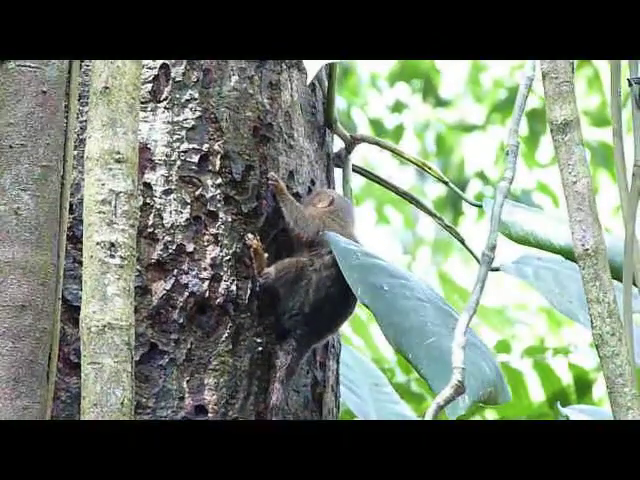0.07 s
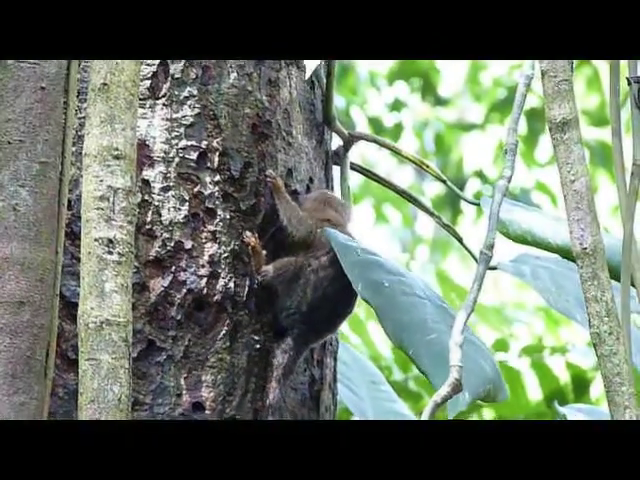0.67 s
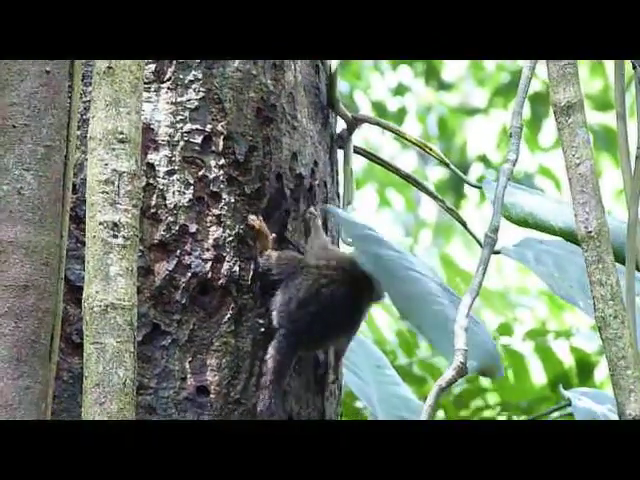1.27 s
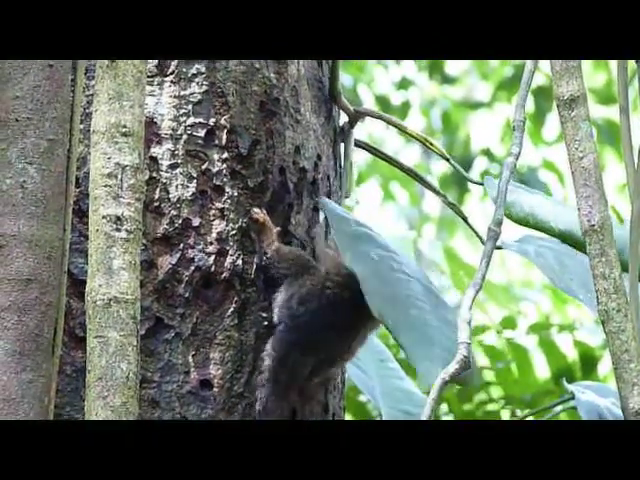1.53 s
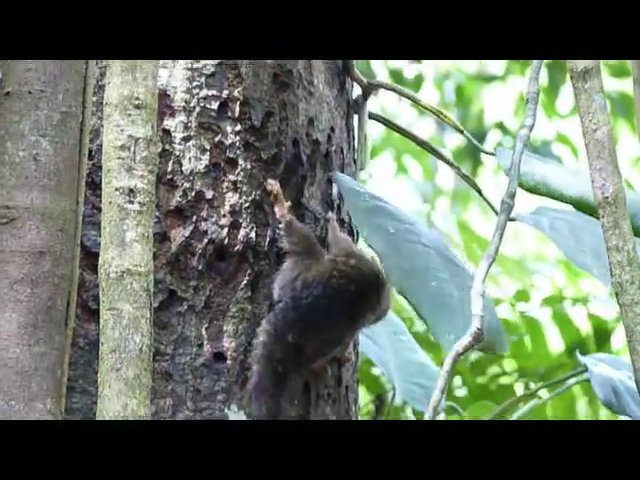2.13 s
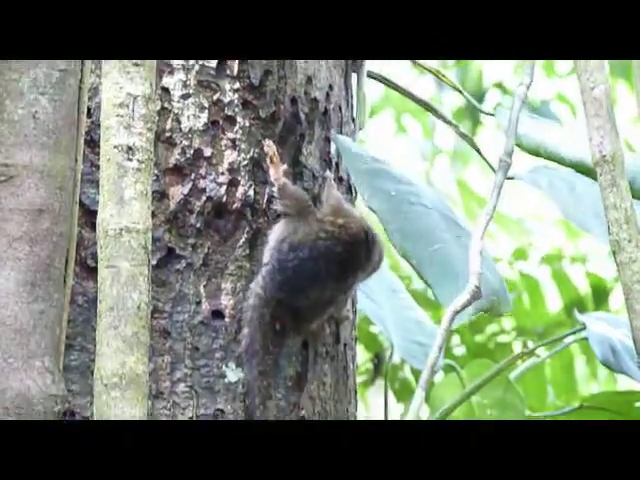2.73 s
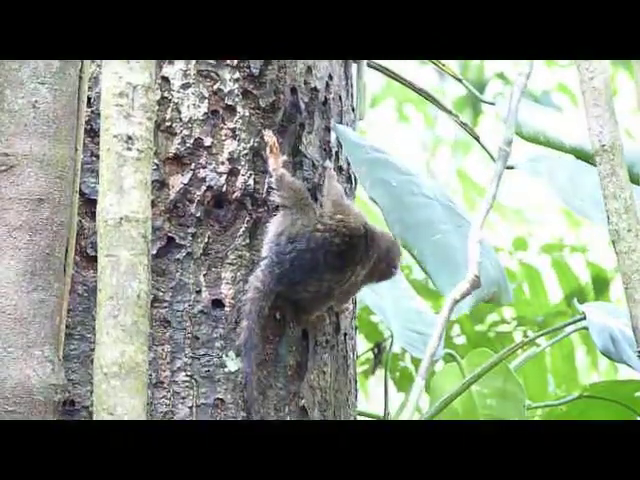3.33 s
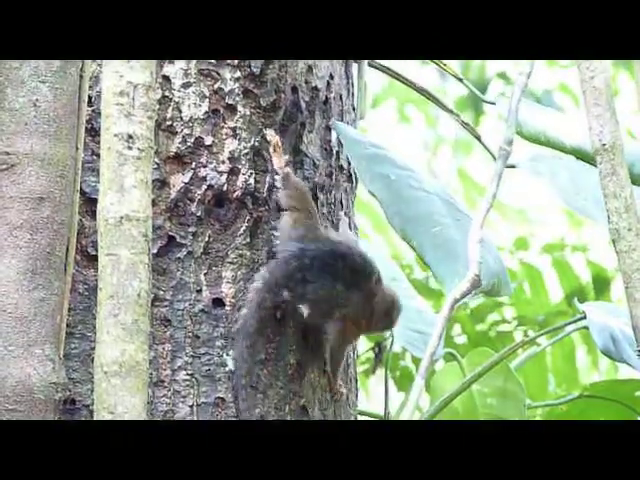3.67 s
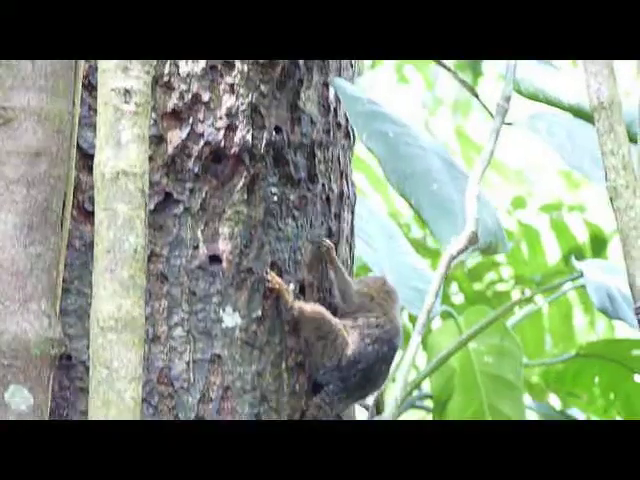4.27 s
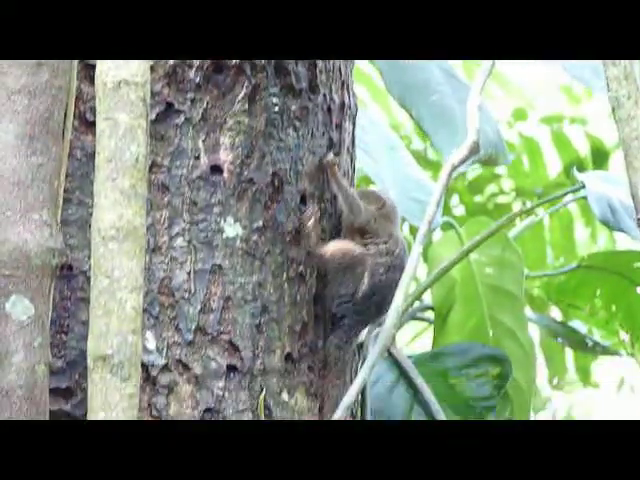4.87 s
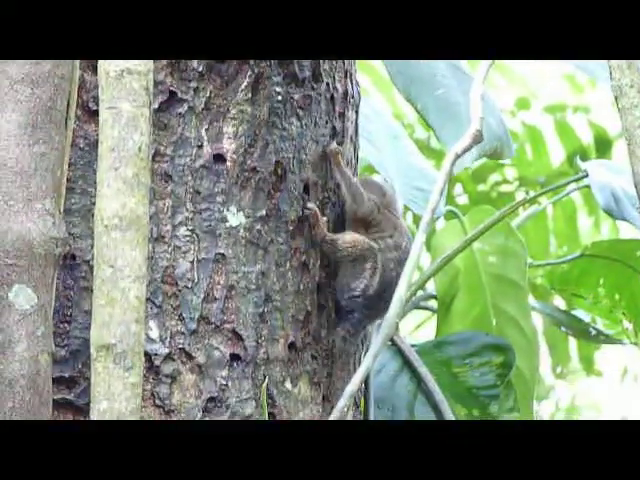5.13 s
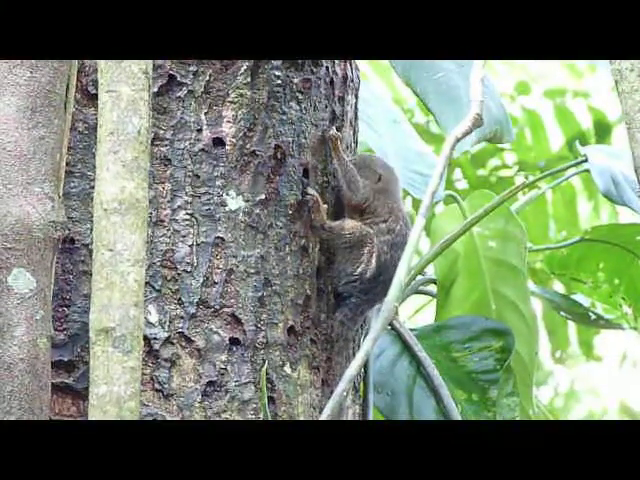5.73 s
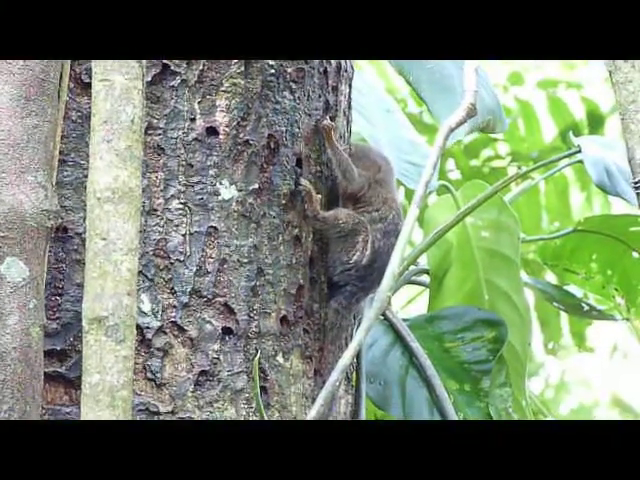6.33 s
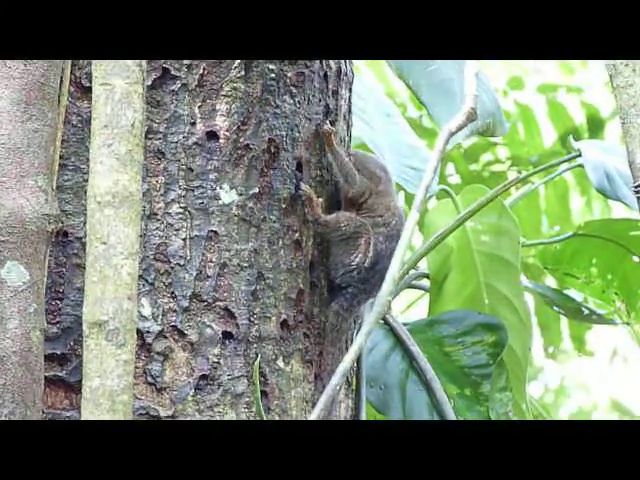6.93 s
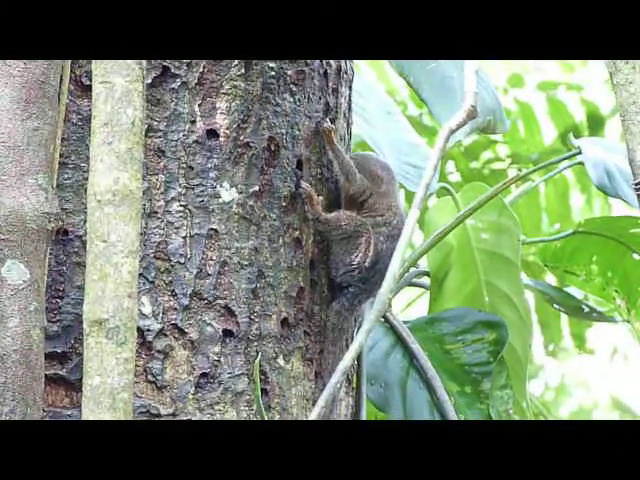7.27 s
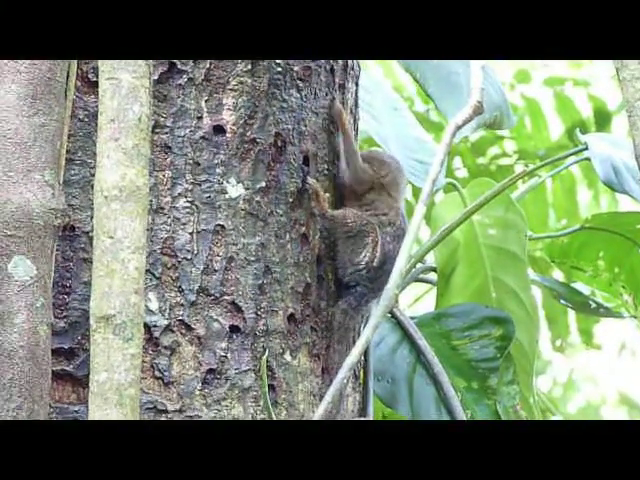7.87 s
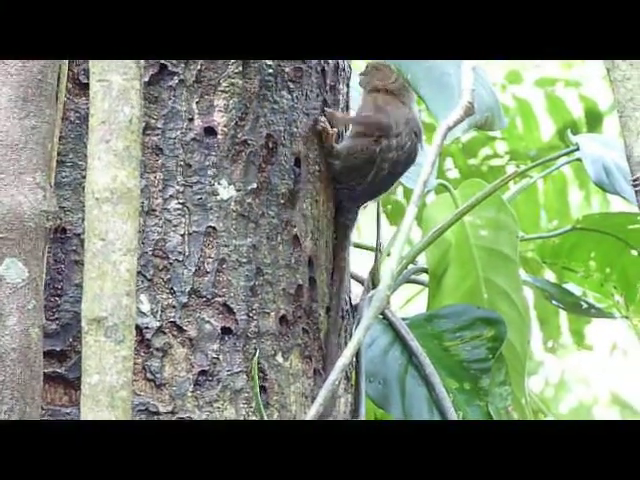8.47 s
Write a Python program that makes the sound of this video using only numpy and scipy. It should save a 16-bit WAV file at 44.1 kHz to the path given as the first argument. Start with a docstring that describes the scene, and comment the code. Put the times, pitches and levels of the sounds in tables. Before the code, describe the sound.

A soft forest rush with a thin insect drone, far birds and sparse drips on leaves, while the camera whirs faintly.

```python
"""A low rush of far air fills a quiet rainforest, with a chorus of insects and distant birds.
The insects merge into one narrow band; the calls arrive blurred by the trunks. A far drone comes
and goes, and a few drips tick on leaves. Right at the microphone, under it all, the camera whirs
in its resonant case, hums and hisses. Two tiny digital clicks break into the signal."""
import sys
import numpy as np
from scipy import signal
from scipy.fft import rfft, irfft
from scipy.io import wavfile
from scipy.ndimage import uniform_filter1d

SR = 44100
rng = np.random.default_rng(int(sys.argv[2]) if len(sys.argv) > 2 else 0)


def master(y):
    """Save y as 16-bit WAV."""
    cut = np.clip(np.atleast_2d(y).T, -1, 1)
    pcm = np.round(cut * 32767)  # scale
    wavfile.write(sys.argv[1], SR, pcm.astype(np.int16))


N = 383669
TIME = np.arange(N) / SR
FREQS = np.fft.rfftfreq(N, 1 / SR)


def gain_of(db):
    """Decibels to amplitude."""
    return 10 ** (np.asarray(db) / 20)


def noise(gain):
    """Noise of rms one, shaped by a gain at each frequency."""
    shaped = irfft(rfft(rng.standard_normal(N)) * gain, N)
    return shaped / np.sqrt(np.mean(shaped ** 2) + 1e-30)


def coloured(points):
    """Noise whose spectrum joins the points (f/Hz, relative level/dB) on a log-frequency axis."""
    hz, db = np.transpose(points)
    return noise(gain_of(np.interp(np.log(FREQS + 1), np.log(hz), db)))


def ringing(hz, width):
    """Noise passed twice through one resonance."""
    return noise(1 / (1 + ((FREQS - hz) / (0.69 * width)) ** 2))


def wander(rate_hz):
    """Slow random motion, up to about the given rate."""
    return noise((FREQS > 0) / (1 + (FREQS / rate_hz) ** 4))


def steadied(x, seconds):
    """Holds the rms near one, evening out swells longer than the given time."""
    size = max(int(seconds * SR), 8)
    power = uniform_filter1d(uniform_filter1d(x ** 2, size), size)
    return x / np.sqrt(power + 1e-20)


def low_passed(x, hz):
    """Steep band limit."""
    taps = signal.firwin(511, hz, window=("kaiser", 9), fs=SR)
    return signal.oaconvolve(x, taps[None], "same")


def clicks(spike_s=.00005, body_db=-1, body_s=.0008, body_hz=800):
    """Two tiny, sharp digital clicks in the signal: each a spike and a short, dull ring."""
    # clicks: t/s, spike level/dB
    spikes = [(1.647, -55.5), (7.647, -68)]
    out, t = np.zeros(N), np.arange(256) / SR
    body = gain_of(body_db) * np.exp(-t / body_s) * np.cos(2 * np.pi * body_hz * t)
    for s, db in spikes:
        out[round(s * SR):][:len(t)] += gain_of(db) * (np.exp(-t / spike_s) + body)
    return out


def hum(waver_rad=0.17):
    """The camera's steady hum and thin whine, wavering a little in phase."""
    # steady tones: f/Hz, rms level/dB
    tones = [(60, -80.5), (120, -74.5), (180.2, -83), (240.3, -86), (271.5, -84), (2419, -101),
             (3560, -103), (4300, -104), (5335, -104), (6666.7, -95.5)]
    out = np.zeros(N)
    for hz, db in tones:
        phase = 2 * np.pi * (hz * TIME + rng.random()) + waver_rad * wander(2)
        out += np.sqrt(2) * gain_of(db) * np.sin(phase)
    return out


def whir(trim_db=0.5, flutter_db=1.5, peak_half_s=0.027):
    """The camera's case resonates at the microphone: noise mainly at 500-600 Hz, uneven in level."""
    # case resonances: f/Hz, width/Hz, base level/dB
    resonances = [(500.3, 38, -72.5), (569.8, 37.2, -68.5), (596.5, 40, -79), (688, 40, -85.5),
                  (771, 50, -84), (853, 55, -81)]
    # slow drift of the level: t/s, relative level/dB
    drift = [(0, -3), (.75, 1.5), (1.02, -5), (1.5, -1.5), (1.85, -2), (2.3, -1), (2.9, -3.5), (3.9, -2),
             (4.6, 1.5), (5.5, -3), (6.3, -1), (6.8, -3), (7.5, 0), (8.7, 1)]
    # brief, irregular peaks in the level of the noise band: t/s, lift/dB
    peaks = [(.18, 5.5), (.58, 1), (.74, 4), (1.1, 6), (1.47, 6), (1.57, 5.5), (2.15, 3.5), (2.3, 9),
             (2.59, 5), (3.1, 5), (3.53, 4), (4.07, 9.5), (4.63, 3), (4.96, 3), (5.16, 8), (5.46, 7),
             (5.68, 6), (5.8, 6), (6.08, 5), (6.96, 5), (7.36, 2), (7.73, 5.5), (8.26, 4), (8.39, 3),
             (8.56, 6)]
    drift_db = np.interp(TIME, *np.transpose(drift))
    peaks_db = sum(lift * np.exp(-((TIME - s) / peak_half_s) ** 2) for s, lift in peaks)
    gain_db = trim_db + drift_db + peaks_db + flutter_db * wander(25)
    case = sum(gain_of(db) * ringing(hz, width) for hz, width, db in resonances)
    return case.std() * steadied(case, seconds=.1) * gain_of(gain_db)


def drone(hz=311.8, width_hz=20):
    """A narrow, fuzzy low tone that comes and goes in the distance."""
    # course of the drone: t/s, level/dB
    course = [(0, -74.5), (.4, -77), (.7, -86), (1.8, -83), (2.1, -74), (3.0, -75), (3.7, -74.5),
              (4.5, -77.5), (5.3, -80), (7.8, -86), (8.7, -75)]
    level_db = np.interp(TIME, *np.transpose(course))
    return gain_of(level_db) * steadied(ringing(hz, width_hz), seconds=0.22)


def drips(rise_s=0.00036):
    """Each falling drop rings a leaf for a few milliseconds."""
    # drops landing: t/s, level/dB, pitch factor
    drops = [(1.451, -54, 1.1), (3.256, -49, 0.98), (3.265, -55, 0.94), (6.247, -58.5, 1.4)]
    # modes of a wet leaf: f/Hz, relative level/dB, t60/s
    leaf = [(1153, -1, 0.015), (1450, -6, 0.0046), (1820, -5.5, 0.011)]
    out, t = np.zeros(N), np.arange(2048) / SR
    attack = 1 - np.exp(-t / rise_s)
    for s, db, pitch in drops:
        tick = sum(gain_of(level - 60 * t / t60) * np.sin(2 * np.pi * (hz * pitch * t + rng.random()))
                   for hz, level, t60 in leaf)
        out[round(s * SR):][:len(t)] += gain_of(db) * tick * attack
    return out


def call(s, length, hz, width, db, rise_hz_per_s=0, echo_db=-12, echo_s=0.15):
    """One arched note centred on time s, blurred by hoarseness and by scattering among the trunks."""
    out = np.zeros(N)
    span = abs(TIME - s) < .8
    t = TIME[span] - s
    lowpass = signal.butter(2, np.clip(width / 2, 5, 2000), fs=SR, output="sos")
    blur = signal.sosfilt(lowpass, rng.standard_normal(len(t)) + 1j * rng.standard_normal(len(t)))
    pitch = hz + rise_hz_per_s * np.clip(t, -length / 2, length / 2)
    tone = np.exp(2j * np.pi * np.cumsum(pitch) / SR)
    note = steadied((blur * tone).real, seconds=0.04)
    arch = np.cos(np.pi / 2 * np.clip(t / (0.81 * length), -1, 1)) ** 2
    echo = gain_of(echo_db) * np.exp(-abs(t) / echo_s) * (t > 0)
    out[span] = gain_of(db) * np.maximum(arch, echo) * note
    return out


def birds():
    """Birds deep in the forest, each kind with its own pitch and hoarseness; also one swell of noise."""
    # one bird's low, clear whistle: centre t/s, f/Hz, level/dB
    whistles = [(.03, 1414, -80), (1.09, 1420, -79), (1.6, 1453, -80), (1.88, 1420, -82), (2.98, 1380, -81),
                (3.38, 1410, -86), (6.71, 1437, -80), (6.87, 1437, -84), (7.18, 1425, -80)]
    # another's thin, higher pips: centre t/s, length/s, f/Hz, level/dB
    pips = [(5.91, .07, 2390, -81), (6.343, .36, 2055, -80), (6.397, .08, 2410, -76.5),
            (7.68, .16, 2520, -83)]
    # hoarse, slightly rising calls: centre t/s, length/s, level/dB
    rasps = [(.7, 0.35, -85), (3.657, 0.22, -82), (4.68, .18, -82), (5.37, 0.22, -85), (6.083, 0.26, -81.5),
             (6.472, .17, -74.5), (6.831, 0.3, -76.5), (7.63, .27, -81)]
    # two long, far calls, then a brief, faint swell of noise near 1.3 kHz:
    # centre t/s, length/s, f/Hz, width/Hz, level/dB
    smears = [(4.95, .62, 1983, 420, -81.5), (6.33, 0.65, 1880, 900, -79), (8.501, 0.29, 1336, 200, -80.5)]
    out = sum(call(s, length=0.14, hz=hz, width=38, db=db) for s, hz, db in whistles)
    out += sum(call(s, length, hz, width=86, db=db) for s, length, hz, db in pips)
    out += sum(call(s, length, hz=2717, width=390, db=db, rise_hz_per_s=720) for s, length, db in rasps)
    return out + sum(call(*row) for row in smears)


def insects(swell_db=0.3):
    """Many stridulating insects, far from the microphone, merge into one narrow band."""
    # overlapping bands of the chorus: f/Hz, width/Hz, level/dB
    bands = [(3086, 110, -83), (3237, 150, -85.5), (3120, 360, -82)]
    chorus = sum(gain_of(db) * ringing(hz, width) for hz, width, db in bands)
    return chorus * gain_of(swell_db * wander(2.1))


def rush(level_db=-69, swell_db=1.0):
    """Far air and foliage, swelling slightly."""
    # spectrum of the rush: f/Hz, relative level/dB
    spectrum = [(20, -13), (70, -6), (140, 2), (430, 0.5), (680, -2.5), (950, -7), (1350, -10.5),
                (1700, -14.5), (2500, -21), (4000, -37.5)]
    return gain_of(level_db + swell_db * wander(3)) * coloured(spectrum)


def scene():
    """The forest and the camera's own running noise, at one microphone."""
    return (rush() + drone() + insects() + birds() + drips() + whir() + hum())[None]


def record(dry, hiss_db=-77, floor_db=-100, dc_offset=-.0037):
    """The microphone amplifier's hiss and band limit, then converter noise, clicks and offset."""
    # spectrum of the amplifier's hiss: f/Hz, relative level/dB
    hiss = [(100, 1), (4000, 0.5), (6800, 0), (7500, -2), (8000, -5.5), (8400, -12), (8800, -30)]
    amplified = low_passed(dry + gain_of(hiss_db) * coloured(hiss), hz=8950)
    converter = gain_of(floor_db) * rng.standard_normal(N) + clicks()
    return low_passed(amplified + converter, hz=16000) + dc_offset


dry = scene()
out = record(dry)
master(out)
```